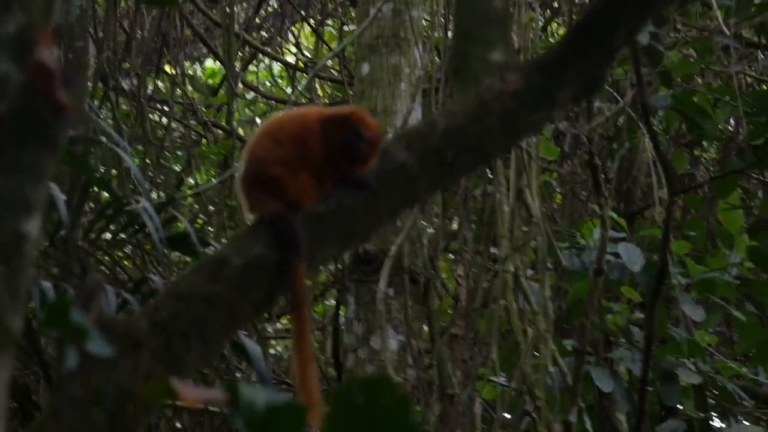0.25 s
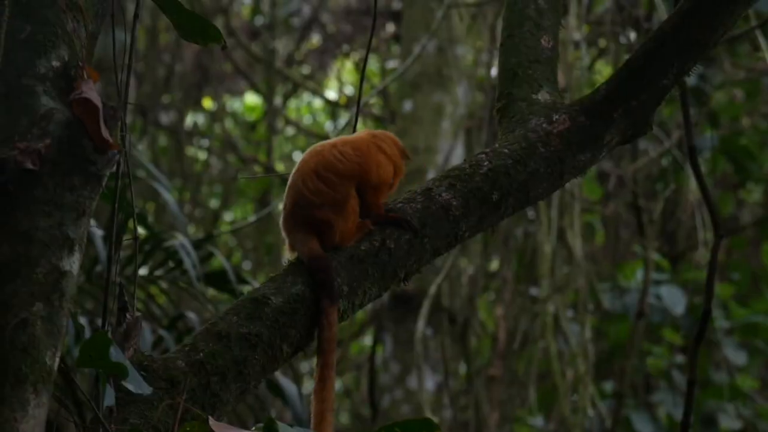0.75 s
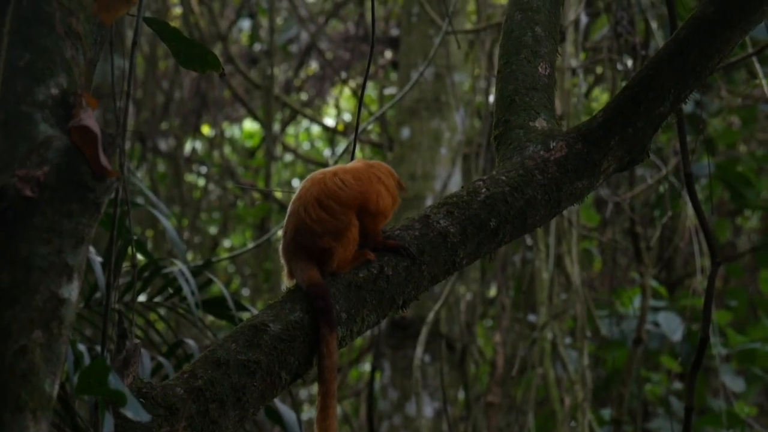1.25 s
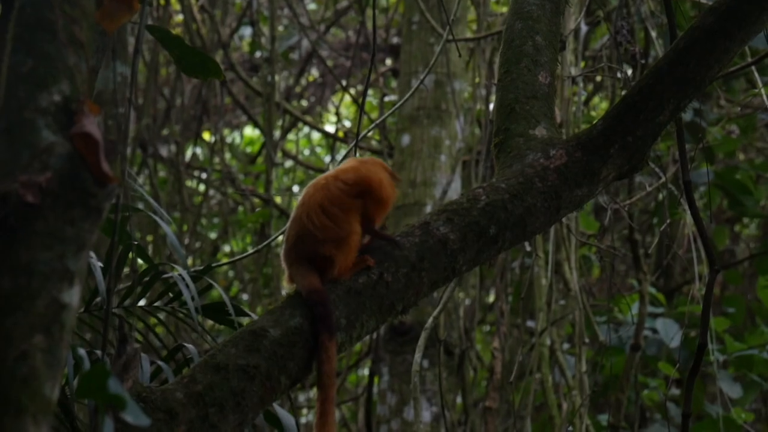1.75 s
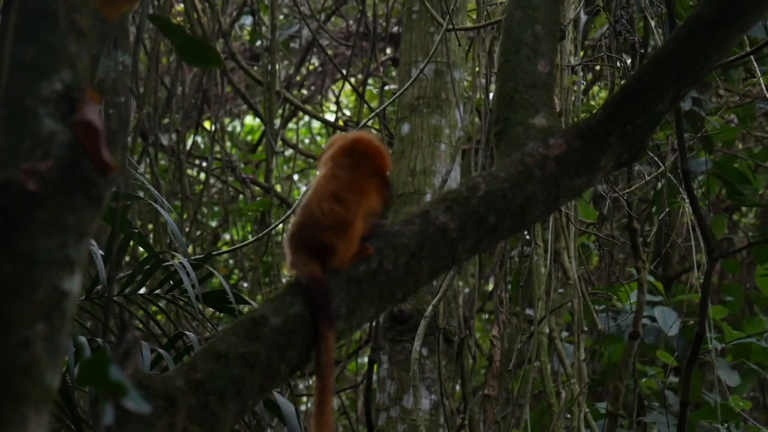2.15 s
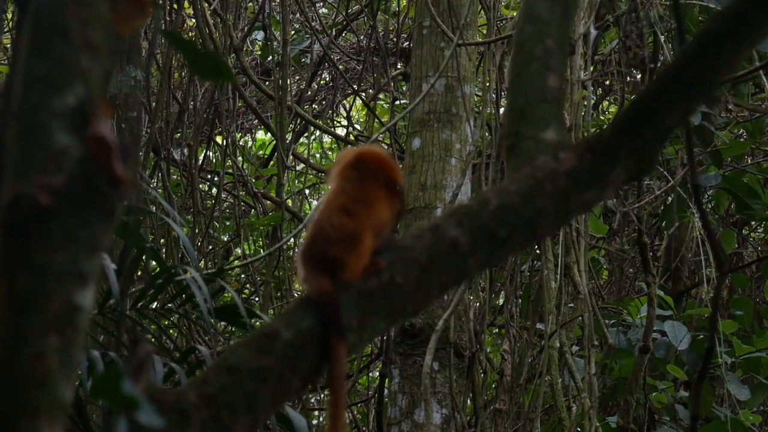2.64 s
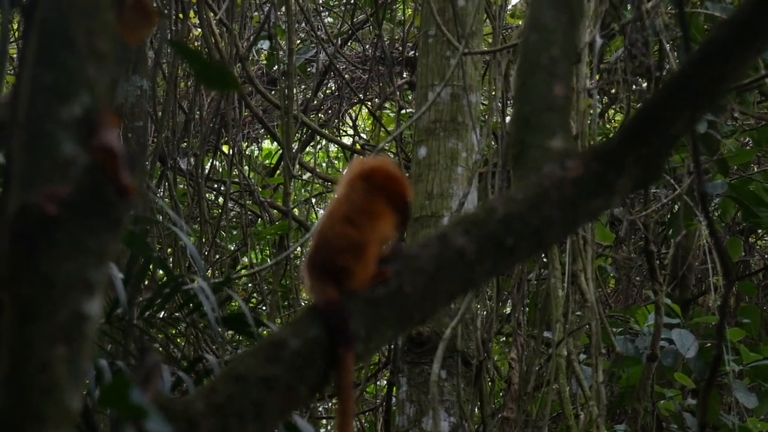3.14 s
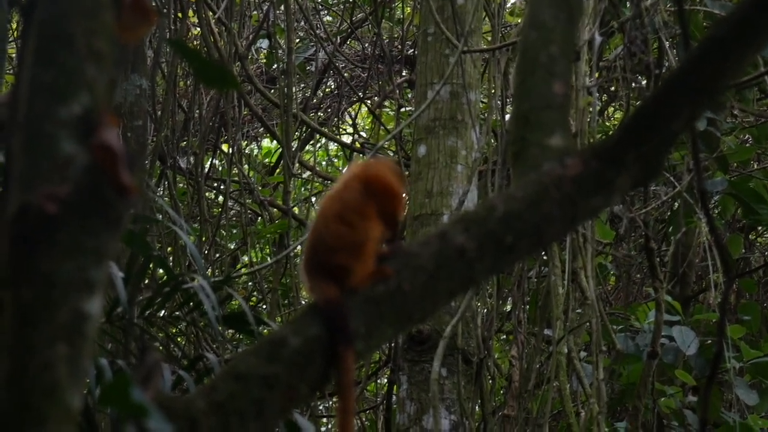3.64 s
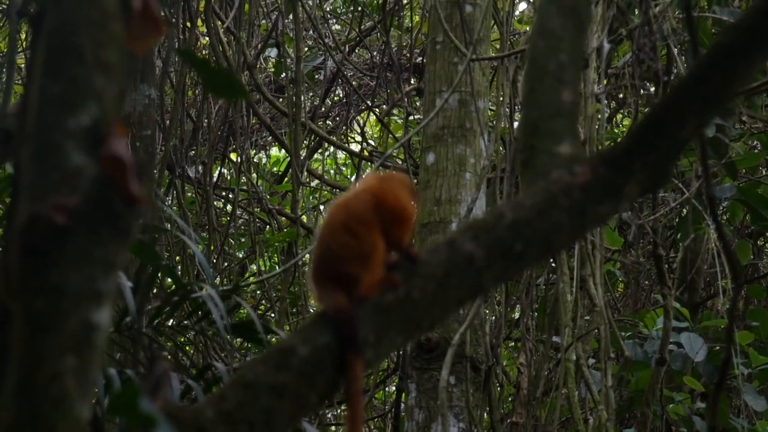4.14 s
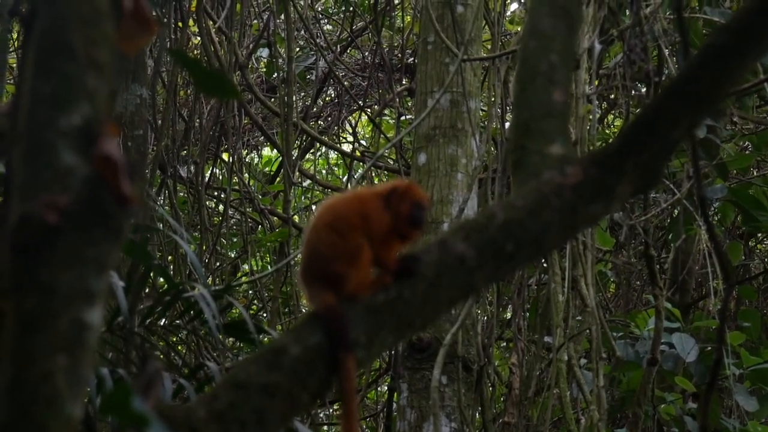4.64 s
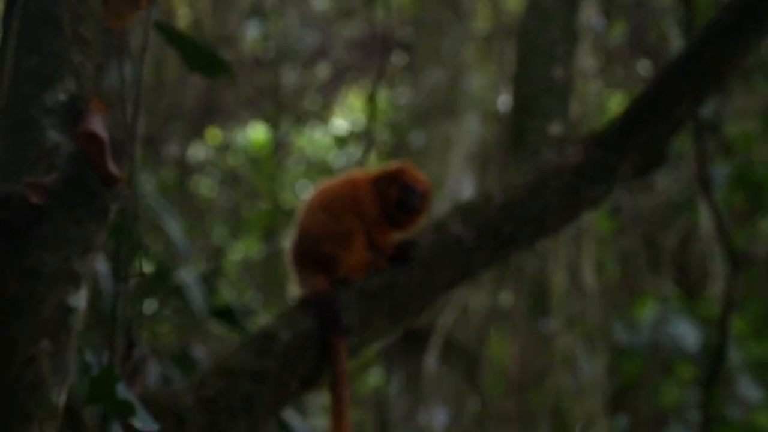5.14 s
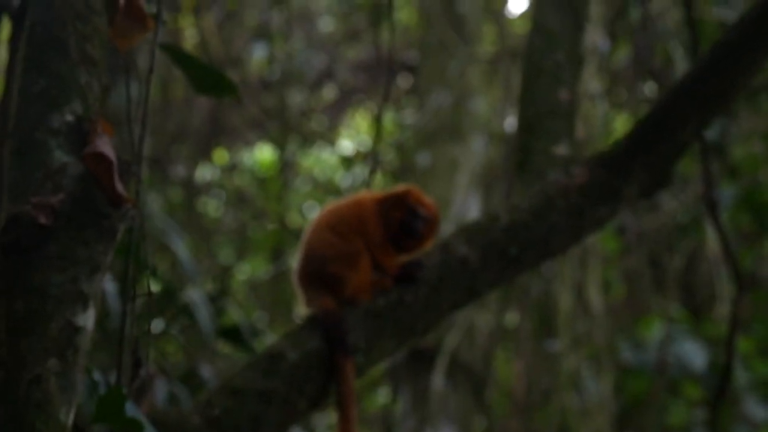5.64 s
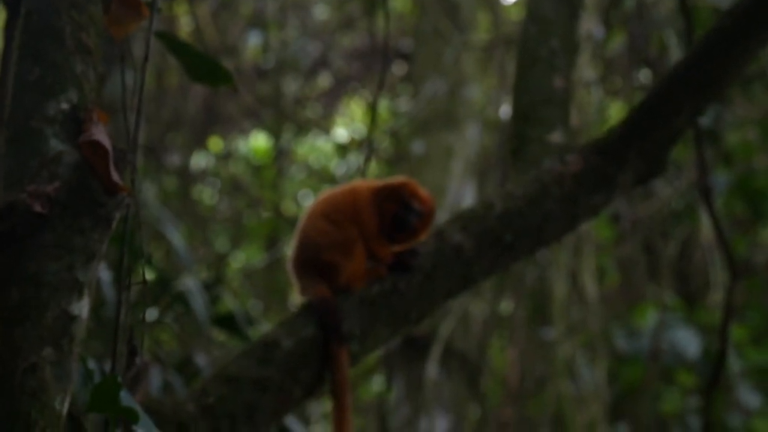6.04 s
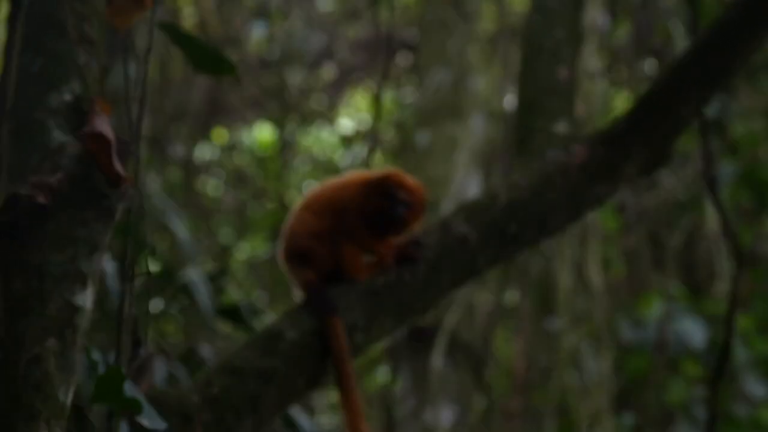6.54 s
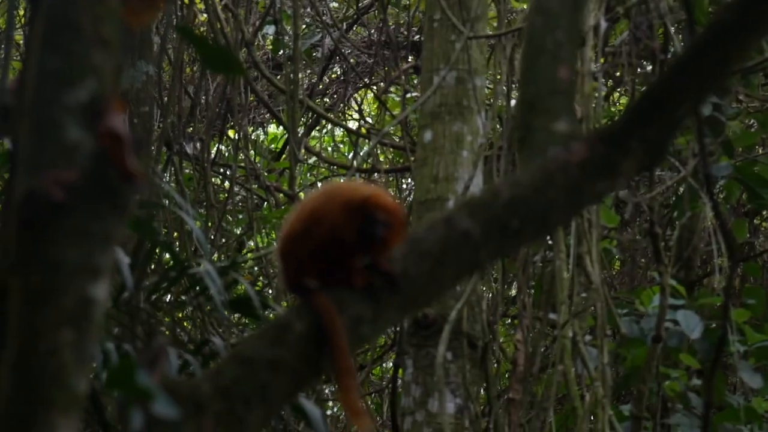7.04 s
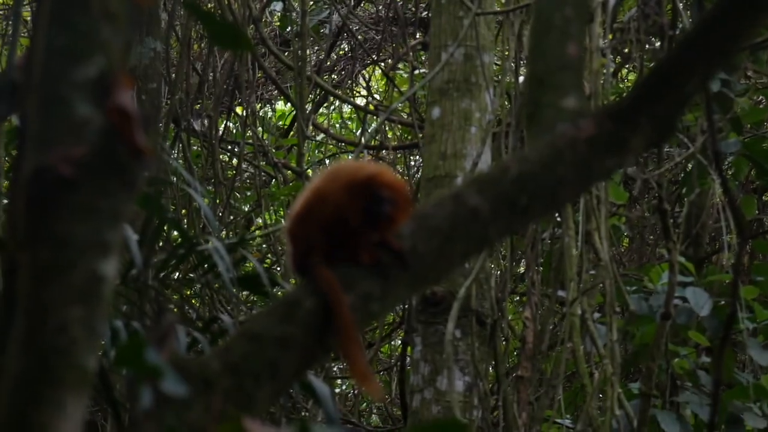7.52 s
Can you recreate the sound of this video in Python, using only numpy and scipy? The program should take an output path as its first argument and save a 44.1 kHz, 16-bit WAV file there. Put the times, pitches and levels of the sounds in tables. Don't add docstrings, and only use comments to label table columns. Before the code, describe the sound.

Small monkey gives shrill warbling whistles and harsh raspy screeches over a soft distant forest roar, with an insect hum and handling clicks.

```python
import sys
import numpy as np
from scipy import signal
from scipy.fft import rfft, irfft, next_fast_len
from scipy.io import wavfile
from scipy.ndimage import uniform_filter1d, minimum_filter1d, map_coordinates

SR = 44100
rng = np.random.default_rng(int(sys.argv[2]) if len(sys.argv) > 2 else 0)


def magnitude_from_level(level_db):
    exponent = np.asarray(level_db, float) / 20
    return 10 ** exponent


def transcribe(signal):
    frames = np.atleast_2d(signal).T
    limited = np.clip(frames, -1, 1)
    pcm = np.round(limited * 32767).astype(np.int16)
    wavfile.write(sys.argv[1], SR, pcm)


N = 343098


def unit(x):
    return x / np.sqrt(np.mean(x ** 2) + 1e-20)


def along(points, hz):
    f, v = np.transpose(points)
    return np.interp(np.log(hz + 1), np.log(f + 1), v)


def curves(rows):
    s, *cols = np.transpose(rows)
    return [np.interp(np.arange(N) / SR, s, c) for c in cols]


def gate(rows, rise_s, fall_s):
    t = np.arange(N) / SR
    opened = np.clip((t - rows[0][0]) / rise_s + .5, 0, 1)
    return opened * np.clip((rows[-1][0] - t) / fall_s + .5, 0, 1)


def wobble(rate_hz):
    knots = rng.standard_normal(int(N * rate_hz / SR) + 4)
    return map_coordinates(knots, [np.arange(N) * rate_hz / SR])


def filtered(x, response):
    m = next_fast_len(N + 8192)
    return irfft(rfft(x, m) * response(np.fft.rfftfreq(m, 1 / SR)), m)[..., :N]


def rush(spectrum, patchy_db):
    # (frequency [Hz], likeness [0-1])
    likeness = [(60, 0.96), (180, 0.86), (550, 0.78), (1650, 0.72), (4970, 0.65), (15000, 0.56)]
    # (frequency [Hz], level [dB])
    lean_db = [(60, -1.5), (240, 0), (950, 0.5), (3770, 0.5), (15000, -1)]
    z = signal.stft(rng.standard_normal((2, N)), nperseg=512)[2]
    field = uniform_filter1d(rng.standard_normal(z.shape[1:]), 6, 0)
    field = uniform_filter1d(field, 14, 1)
    pair = signal.istft(z * magnitude_from_level(patchy_db * unit(field)), nperseg=512)[1][:, :N]

    def mid_side(hz):
        angle = np.arccos(np.clip(along(likeness, hz), -1, 1)) / 2
        return magnitude_from_level(along(spectrum, hz)) * [np.cos(angle), np.sin(angle)]

    mid, side = filtered(pair, mid_side)
    left_right = np.array([mid + side, mid - side])
    return unit(filtered(left_right, lambda hz: magnitude_from_level(np.outer([.5, -.5], along(lean_db, hz)))))


def forest(x, wet_db, early_db, wide_db):
    # (frequency [Hz], t60 [s])
    t60_s = [(1000, 0.45), (5000, 0.6), (9000, 0.51), (15000, 0.54)]
    # (frequency [Hz], level [dB])
    width_db = [(3000, 0), (7000, -14.5), (10000, -4.5), (14000, -1.5)]
    hz, t, z = signal.stft(rng.standard_normal((2, SR)), SR, nperseg=256)
    z[1] *= magnitude_from_level(wide_db + along(width_db, hz))[:, None]
    late = magnitude_from_level(-60 * t / along(t60_s, hz)[:, None])
    early = magnitude_from_level(early_db - 60 * t / 0.098)
    mid, side = signal.istft(z * (late + early), SR, nperseg=256)[1]
    tail = np.array([mid + side, mid - side]) / np.linalg.norm(mid)
    return magnitude_from_level(wet_db) * signal.fftconvolve(x[None], tail, axes=1)[:, :N]


def tone(rows, unsteady, rate_hz, flutter_db):
    hz, db = curves(rows)
    phase = 2 * np.pi * np.cumsum(hz * (1 + unsteady * wobble(rate_hz))) / SR
    level = magnitude_from_level(db + 4.5 + flutter_db * wobble(rate_hz))
    return gate(rows, .006, .02) * level * np.sin(phase)


def roar():
    # (time [s], low layer [dB], middle layer [dB])
    shot_levels = [
        [(0.0, -29.5, -34), (0.112, -34, -30.5), (0.56, -32, -32)],
        [(1.25, -40.5, -37.5), (2.28, -40, -39), (2.76, -38.5, -37.5), (7.78, -37.5, -37.5)],
    ]
    # (frequency [Hz], density [dB per Hz])
    low_spectrum = [(76, -48), (130, -24), (199, -6.5), (280, -4.5), (314, -2), (657, -5.5), (800, -6),
                    (1040, -7.5), (1760, -120)]
    # (frequency [Hz], density [dB per Hz])
    middle_spectrum = [(350, -35.5), (600, -3.5), (656, -9), (704, -6), (1150, -1.5), (1300, -2),
                       (1830, -8), (2710, -21), (5000, -36.5), (6500, -63), (11000, -120)]
    # (frequency [Hz], density [dB per Hz])
    opening_spectrum = [(350, -35), (600, -5), (1100, -1), (1940, -16), (2120, -20.5), (3400, -25),
                        (4420, -54.5), (7480, -120)]
    # (frequency [Hz], density [dB per Hz])
    rumble_spectrum = [(16, -40), (28, -9.5), (39, 0), (54, 3.5), (97, -2), (129, -6.5), (170, -4.5),
                       (220, -35.5), (370, -120)]
    opening = np.arange(N) < SR * 4 // 5
    low_db, middle_db = np.where(opening, curves(shot_levels[0]), curves(shot_levels[1]))
    swell = wobble(6)
    low = magnitude_from_level(low_db + 0.38 * swell) * rush(low_spectrum, patchy_db=0.1)
    middle = np.where(opening, rush(opening_spectrum, patchy_db=0.9), rush(middle_spectrum, patchy_db=1.24))
    rumble = magnitude_from_level(-48.5) * rush(rumble_spectrum, patchy_db=0.85)
    return low + magnitude_from_level(middle_db + 0.18 * swell) * middle + rumble


def hiss():
    # (frequency [Hz], density [dB per Hz])
    hiss_spectrum = [(1760, -30), (3000, -3), (4780, -10.5), (7050, -19.5), (7990, -21.5), (9990, -21),
                     (14500, -30), (15400, -19.5), (15800, -44)]
    return magnitude_from_level(-58.5) * rush(hiss_spectrum, patchy_db=2.5)


def insect():
    # (nearest [s], time to fall 3 dB [s], level [dB])
    passes = [
        (.03, 0.06, -37),
        (.16, .05, -39.5),
        (.32, 0.06, -36.5),
        (.48, .06, -38.5),
        (.63, 0.05, -36),
        (.98, 0.14, -43),
        (1.21, 0.36, -49),
        (1.52, 0.23, -43),
        (3.2, 0.9, -52),
    ]
    wing_hz, wing_later_hz, gone_s = 343.5, 315, 3.8
    t = np.linspace(0, gone_s, num=400)
    power = sum(magnitude_from_level(2 * db) / (1 + ((t - s) / width_s) ** 4) for s, width_s, db in passes)
    hz = np.where(t < 4 / 5, wing_hz, wing_later_hz)
    rows = np.transpose([t, hz, 10 * np.log10(power)])
    return tone(rows, unsteady=.012, rate_hz=25, flutter_db=2.4) * magnitude_from_level(-1.5)


def call(t, strokes, end_s, octave_db, tremble, flutter_db):
    # (pitch [Hz], gain [dB])
    pitch_gain = [(4100, -23.5), (4900, -13), (5500, -4.5), (6200, -0.5), (7000, 2.5), (8000, -1),
                  (10000, 1), (12200, -10)]
    # (pitch [Hz], gain [dB])
    octave_gain = [(4100, -14), (4900, -4), (5500, -4), (6200, -11), (7000, -11.5), (7900, -27)]
    rise_s, full_leap, rise_dip_db = 0.014, 0.11, -1
    slack = 1.5
    leap_octave_db = -7.5
    octave_grows, usual_effort_db = .4, -24.5
    s, top, bottom, db = np.transpose(strokes)
    leap = np.clip((top[1:] / bottom[:-1] - 1) / full_leap, .01, 1)
    sunk = np.append(s[1:] - rise_s * leap, end_s)
    turns = np.ravel([s, np.maximum(sunk, s + .001)], order="F")
    corners_hz = np.ravel([top, bottom], order="F")
    hz = np.interp(t, turns, corners_hz ** -slack) ** (-1 / slack)
    hz = uniform_filter1d(hz, size=160)
    climb = np.maximum(np.gradient(np.log(hz), t) * rise_s / full_leap, 0)
    effort_db = np.interp(t, turns, np.repeat(db, repeats=2)) + rise_dip_db * np.minimum(climb, 1)
    effort_db = uniform_filter1d(effort_db, size=160)
    phase = 2 * np.pi * np.cumsum(hz * (1 + tremble)) / SR
    leapt = uniform_filter1d(climb, size=801, origin=400)
    strain_db = octave_grows * (effort_db - usual_effort_db)
    upper_db = along(octave_gain, hz) + octave_db + leap_octave_db * leapt + .17 * flutter_db + strain_db
    octave = magnitude_from_level(upper_db) * np.sin(2 * phase) * (hz < 8000)
    fundamental = magnitude_from_level(along(pitch_gain, hz) + flutter_db) * np.sin(phase)
    ends = np.clip((t - s[0]) / 0.0059 + .5, 0, 1) * np.clip((end_s - t) / .004 + .5, 0, 1)
    return ends * magnitude_from_level(effort_db + 3) * (fundamental + octave)


def whistles():
    # (time [s], top [Hz], bottom [Hz], effort [dB])
    first_calls = [
        [(.9, 9870, 8250, -27), (.925, 10170, 10010, -32)],
        [(.94, 10000, 9800, -26), (.9425, 9800, 7370, -26), (.947, 7410, 6720, -23), (.967, 8210, 6230, -23),
         (1.005, 7310, 6270, -20.5), (1.045, 7700, 5970, -21), (1.09, 7990, 6990, -25),
         (1.105, 6990, 5380, -24), (1.134, 5350, 4400, -27.5)],
        [(1.323, 9900, 9150, -30), (1.328, 9140, 8830, -28), (1.355, 8850, 7000, -26), (1.379, 7020, 6710, -24),
         (1.397, 6700, 5930, -22), (1.42, 5930, 5610, -24), (1.47, 7090, 5700, -19.5), (1.5, 6750, 5580, -20),
         (1.535, 6510, 5370, -21), (1.568, 6250, 5550, -21.5), (1.587, 5540, 4900, -22),
         (1.601, 4900, 4850, -23), (1.633, 5530, 5550, -25), (1.652, 5500, 5090, -22), (1.664, 5100, 3980, -22)],
    ]
    middle_calls = [
        [(1.84, 8450, 8220, -30.5), (1.852, 8200, 7950, -26), (1.87, 7920, 6880, -26),
         (1.897, 7490, 6130, -22.5), (1.922, 6000, 6180, -20.5), (1.938, 6100, 5550, -22.5),
         (1.965, 5550, 5410, -21.5), (1.993, 5920, 5300, -27)],
        [(2.0, 8070, 8100, -23), (2.013, 7920, 7100, -15), (2.017, 7120, 6700, -14.5), (2.026, 6680, 6100, -17),
         (2.033, 6100, 4956, -21.5), (2.058, 7000, 5350, -25), (2.095, 6860, 5550, -24.5),
         (2.115, 5550, 4970, -23.5), (2.125, 5000, 4040, -22)],
        [(2.345, 10200, 9040, -34), (2.349, 9050, 8850, -28.5), (2.378, 8960, 6240, -23.5),
         (2.406, 6250, 6140, -26), (2.426, 10120, 8810, -22), (2.434, 8800, 7920, -24),
         (2.452, 7900, 6600, -24.5), (2.485, 9000, 7900, -24), (2.508, 7910, 6000, -25),
         (2.534, 6010, 5870, -25.5), (2.546, 5880, 5280, -29.5)],
    ]
    late_calls = [
        [(4.155, 6520, 6300, -63)],
        [(4.16, 12300, 9540, -36), (4.172, 9510, 8830, -28.5), (4.195, 8900, 7400, -31.5),
         (4.207, 7400, 7220, -31.5), (4.223, 12240, 12000, -24), (4.231, 11980, 7300, -26),
         (4.243, 7300, 6050, -27.5), (4.256, 6050, 5850, -26), (4.283, 11200, 7300, -30.5),
         (4.292, 7310, 5310, -26.5), (4.314, 5300, 5270, -34)],
        [(4.52, 8300, 7700, -35), (4.531, 7700, 6500, -27.5), (4.56, 7960, 5940, -24),
         (4.587, 7670, 5420, -25.5), (4.61, 5690, 5240, -23.5), (4.65, 5400, 4950, -24),
         (4.735, 4950, 4750, -25), (4.76, 5590, 5100, -22), (4.775, 5110, 4000, -21.5),
         (4.806, 7530, 5640, -28), (4.818, 5600, 5100, -25.5), (4.834, 5100, 3890, -22)],
    ]
    rasp_ends = [
        [(.001, 6050, 5900, -33.5)],
        [(6.143, 7240, 6250, -40), (6.165, 6260, 6180, -36)],
        [(6.7, 6580, 6570, -28), (6.722, 6500, 5250, -32)],
        [(7.428, 6305, 6337, -29), (7.458, 6330, 5320, -29)],
        [(7.638, 7400, 6260, -35.5), (7.65, 6250, 5900, -35)],
        [(7.67, 6590, 6650, -36.5)],
    ]
    # (end [s], octave [dB])
    call_ends = [(.941, 0), (1.14, -1.5), (1.673, -1.5), (2.02, -0.5), (2.134, 2), (2.552, 2), (4.21, 0),
                 (4.325, -2), (4.855, 1.5), (.028, -3), (6.19, -2), (6.737, -7), (7.47, -6), (7.665, -1),
                 (7.78, -6)]
    tremble, flutter, voice = wobble(250), wobble(180), np.zeros(N)
    calls = first_calls + middle_calls + late_calls + rasp_ends
    for strokes, (end_s, octave_db) in zip(calls, call_ends):
        start = max(round((strokes[0][0] - .005) * SR), 0)
        at = slice(start, round((end_s + .005) * SR))
        t = np.arange(N)[at] / SR
        voice[at] += call(t, strokes, end_s, octave_db, .007 * tremble[at], 2.3 * flutter[at])
    return voice


def rasps():
    # (time [s], level [dB], brightness [dB], throat stretch [ratio, over 1 raises resonances])
    rasp_rows = [
        [(0.028, -29.5, -7, 0.97), (0.634, -30, -8, 0.99), (0.66, -53, -12.5, 1)],
        [(6.185, -31, -10, 1), (6.525, -30, 1, 0.94), (6.72, -33.5, -5.5, 0.96)],
        [(6.826, -37, 1.5, 0.79), (6.87, -30.5, -1, 0.92), (7.44, -32.5, -7.5, 1)],
        [(7.655, -35.5, -11, 0.91), (7.701, -33.5, -6, 0.94), (7.78, -29.5, -10.5, 0.94)],
    ]
    # (frequency [Hz], density [dB per Hz])
    throat_near = [(2530, -52), (4300, -20), (4740, -25.5), (6060, -6), (7290, -2), (8130, -12),
                   (13800, -25), (15100, -34), (15500, -38), (15800, -80.5)]
    # (frequency [Hz], density [dB per Hz])
    throat_far = [(2530, -20.5), (4300, -21), (4820, -21), (6060, -5), (7060, 1), (8630, -8.5),
                  (9890, -10.5), (10700, -11), (11600, -19.5), (14400, -21.5), (15300, -23), (15800, -38.5)]
    chance, size = rng.random(N), rng.standard_normal(N)
    pulses = (chance < 9000 / SR) * size * magnitude_from_level(0.97 * wobble(600) + 1.8 * wobble(40))
    quiver, voice = wobble(25), np.zeros(N)
    for rows, throat in zip(rasp_rows, [throat_near, throat_far, throat_far, throat_far]):
        start = max(round(rows[0][0] * SR) - SR // 20, 0)
        at = slice(start, round(rows[-1][0] * SR) + SR // 20)
        db, bright_db, stretch = (c[at] for c in curves(rows))
        hz, t, z = signal.stft(pulses[at], SR, nperseg=512)
        hz = hz[:, None]
        frames = np.minimum((t * SR).astype(int), len(db) - 1)
        moving = (stretch + 0.015 * quiver[at])[frames]
        shaped = z * magnitude_from_level(along(throat, hz / moving))
        edge = 1 / (1 + (hz / 8500) ** 8)
        low = unit(signal.istft(shaped * edge, SR, nperseg=512)[1][:len(db)])
        high = unit(signal.istft(shaped * (1 - edge), SR, nperseg=512)[1][:len(db)])
        voice[at] += gate(rows, 0.014, 0.033)[at] * magnitude_from_level(db - 6.5) * (low + magnitude_from_level(bright_db) * high)
    return voice


def monkeys():
    # (frequency [Hz], gain [dB])
    shade = [(5000, -4.5), (10000, 1), (15000, -9)]
    clear, hoarse = whistles(), rasps()
    direct = filtered(clear + hoarse, lambda hz: magnitude_from_level(along(shade, hz))) * magnitude_from_level(-2.0)
    clear_wet = forest(clear, wet_db=0.4, early_db=4.5, wide_db=-1.0)
    hoarse_wet = forest(hoarse, wet_db=3.5, early_db=2.0, wide_db=-1.5)
    return (direct + clear_wet + hoarse_wet) * magnitude_from_level([[-.8], [.8]])


def birds():
    # (time [s], pitch [Hz], level [dB])
    near_rows = [(.028, 3860, -39.5), (.06, 3900, -38.5), (.1, 3915, -40), (.14, 3870, -41),
                 (.3, 3896, -42), (.42, 3915, -43), (.48, 3840, -45), (.515, 3880, -51), (.56, 3940, -51),
                 (.578, 3900, -58)]
    # (time [s], pitch [Hz], level [dB])
    far_rows = [
        (3.1, 4900, -69),
        (3.16, 4750, -64),
        (3.22, 4300, -70),
    ]
    near = magnitude_from_level(-1.0) * tone(near_rows, unsteady=0.002, rate_hz=40, flutter_db=1.1)
    far = tone(far_rows, unsteady=.02, rate_hz=90, flutter_db=1.9)
    near_wet = forest(near, wet_db=-6.0, early_db=-6.5, wide_db=-2.5)
    far_wet = forest(far, wet_db=-14.0, early_db=1.0, wide_db=4.5)
    return near + near_wet + far + far_wet


def clicks():
    # (time [s], peak [dB], crack [dB], left-right [dB], ring time [s])
    click_rows = [(0.0826, -2.5, -21, -7.5, 0.012), (0.5015, -21, -3.5, -7, 0.015),
                  (3.6637, -6, -27.5, -2, 0.0038), (3.6776, -15, -9.5, 0.5, 0.011),
                  (3.979, -33, 1.5, 1, 0.009), (5.0438, -30, -3, 3, 0.01), (5.066, -15.5, -27, -2, 0.01),
                  (5.0775, -2.5, -18, -6, 0.016), (5.473, -10, -19.5, 0, 0.015),
                  (5.6035, -24, -12, -15, 0.0063), (5.612, -36, 2, 7, 0.009),
                  (5.6913, -28, -17, -3, 0.0098), (5.8287, -28.5, -21, -2, 0.009),
                  (5.9201, -29.5, 0.5, 1, 0.0078), (7.1557, -22.5, -6.5, -11, 0.0074),
                  (7.7613, -24, -1.5, 4, 0.01)]
    # (frequency [Hz], level [dB])
    body_modes = [(1030, -9.5), (1250, -7), (1520, -9.5), (1855, -4), (2490, -8), (3100, -14.5),
                  (3620, -6.5)]
    # (frequency [Hz], density [dB per Hz])
    knock_spectrum = [(1060, -36), (1800, -10.5), (3000, 0), (4030, -8.5), (6390, -14), (7000, -13.5),
                      (9100, -40.5), (15400, -120)]
    # (frequency [Hz], density [dB per Hz])
    crack_spectrum = [(1500, -22), (3000, 4.5), (5000, -4.5), (8000, 0), (10500, -0.5), (13000, -16.5),
                      (15500, -15), (16500, -45)]
    ring, knock, crack = np.zeros((3, 2, N + SR))
    t = np.arange(SR // 20) / SR
    modes = sum(magnitude_from_level(level) * np.sin(2 * np.pi * hz * t) for hz, level in body_modes)
    afterglow = magnitude_from_level(-32 - 60 * t / 0.09)
    for s, db, crack_db, pan_db, t60 in click_rows:
        at = slice(round(s * SR), round(s * SR) + len(t))
        a = rng.standard_normal((4, len(t)))
        a /= np.std(a[:, :SR // 700], axis=1, keepdims=True)
        shape = (1 - np.exp(-t / 0.00058)) * magnitude_from_level([[db + pan_db / 2], [db - pan_db / 2]])
        ring[:, at] += shape * modes * magnitude_from_level(0.77 * db - 60 * t / (1.11 * t60))
        knock[:, at] += shape * (a[0] + [[.45], [-.45]] * a[1]) * magnitude_from_level(6.0 - 60 * t / t60)
        crack_decay = magnitude_from_level(-60 * t / (0.7 * t60)) + afterglow
        crack[:, at] += shape * (a[2] + [[.4], [-.4]] * a[3]) * magnitude_from_level(crack_db + 9.5) * crack_decay
    knock = filtered(knock[:, :N], lambda hz: magnitude_from_level(along(knock_spectrum, hz)))
    crack = filtered(crack[:, :N], lambda hz: magnitude_from_level(along(crack_spectrum, hz)))
    return ring[:, :N] + knock + crack


def leaves():
    # (time [s], level [dB], rise [s], length [s])
    brushes = [
        (3.451, -65.5, 0.0094, 0.078),
        (3.6, -69, .03, 0.083),
        (5.073, -42, .003, 0.017),
        (5.12, -68.5, .02, .1),
        (5.52, -66, .02, .05),
        (5.58, -54.5, .004, 0.04),
        (5.685, -61, 0.0051, 0.058),
        (5.783, -69, .02, .06),
    ]
    # (frequency [Hz], density [dB per Hz])
    leaf_spectrum = [(2500, -30), (4000, -7), (7000, 3.5), (10500, -2.5), (13000, -28), (15800, -26)]
    t = np.arange(N) / SR
    stir = np.zeros(N)
    for s, db, rise_s, length_s in brushes:
        fade = np.exp(-np.maximum(t - s - length_s, 0) / .015)
        stir += magnitude_from_level(db) * np.clip((t - s) / rise_s, 0, 1) * fade
    return stir * magnitude_from_level(2.1 * wobble(83)) * rush(leaf_spectrum, patchy_db=0.5)


def scene():
    return roar() + hiss() + insect() + monkeys() + birds() + clicks() + leaves()


def masked(x):
    # (frequency [Hz], level [dB])
    mask_db = [(2200, -70), (4000, -51.5), (5400, -59.5), (8000, -42.5), (12000, -39), (15000, -35.5)]
    # (frequency [Hz], share [0-1])
    starved = [(2000, 0), (2800, .7), (3300, .75), (4600, .85), (5600, .5), (13000, .75)]
    beside_db = -36
    hz, _, z = signal.stft(x, SR, nperseg=2048, noverlap=1536)
    band = uniform_filter1d(np.mean(np.abs(z) ** 2, axis=0), size=7, axis=0)
    loudest = band[hz > 3500].max(axis=0) + 1e-20
    over = band / (loudest * magnitude_from_level(2 * along(mask_db, hz))[:, None])
    neighbour = -minimum_filter1d(-band * (hz > 4200)[:, None], size=121, axis=0)
    over = np.minimum(over, band / (neighbour * magnitude_from_level(2 * beside_db) + 1e-20))
    whim = uniform_filter1d(rng.standard_normal(band.shape), size=5, axis=0)
    whim = unit(uniform_filter1d(whim, size=7, axis=1))
    high, low = band[hz > 5000].sum(axis=0), band[hz < 5000].sum(axis=0)
    busy = np.clip(2 * high / (low + 1e-20), 0, 1)
    spared = whim < 3.5 - 3.4 * busy * along(starved, hz)[:, None]
    fed = spared | (band > loudest / 60)
    passed = 1 / (1 + (hz / 15400) ** 60)
    gain = fed * passed[:, None] / (1 + (over + 1e-9) ** -4.0)
    return signal.istft(z * gain, SR, nperseg=2048, noverlap=1536)[1][:, :N]


def low_pass(x):
    return signal.sosfilt(signal.butter(12, 16440, fs=SR, output="sos"), x)


def record(dry):
    # (time [s], gain [dB], recovery [s])
    ducks = [
        (0.083, -6.5, 0.084),
        (2.019, -14.5, 0.075),
        (5.078, -2.5, 0.025),
    ]
    # (time [s], gain [dB])
    edit = [
        (.641, 2),
        (.65, -21),
        (.662, -31),
        (.666, -55),
        (.683, -55.5),
        (.686, -120),
        (.936, -120),
        (.9385, -56),
        (.9405, 0.5),
    ]
    duck_db = np.zeros(N)
    for s, db, recovery_s in ducks:
        after = np.maximum(np.arange(N) / SR - s, 0)
        duck_db += db * (1 - np.exp(-after / 0.025)) * np.exp(-after / recovery_s)
    steady = filtered(dry, lambda hz: 1 / (1 + (44 / (hz + 1)) ** 6))
    held = steady * magnitude_from_level(duck_db)
    held = held / (1 + np.abs(held / .9) ** 6) ** (1 / 6)
    return low_pass(masked(held) * magnitude_from_level(curves(edit)[0]))


dry = scene()
out = record(dry)
transcribe(out)
```